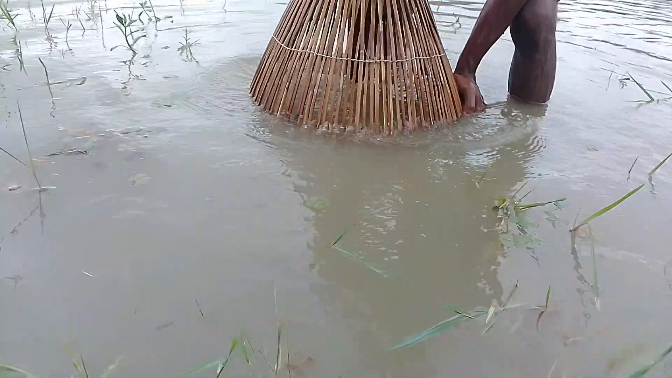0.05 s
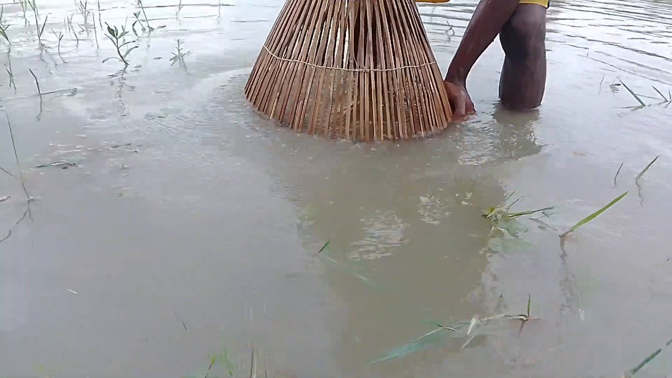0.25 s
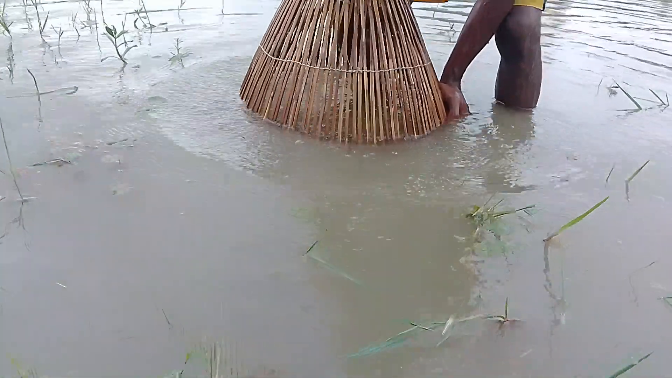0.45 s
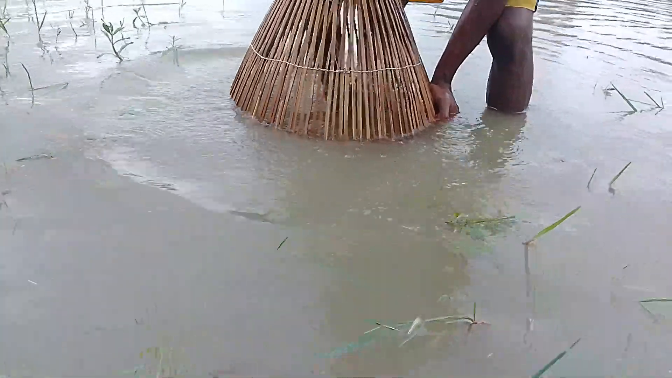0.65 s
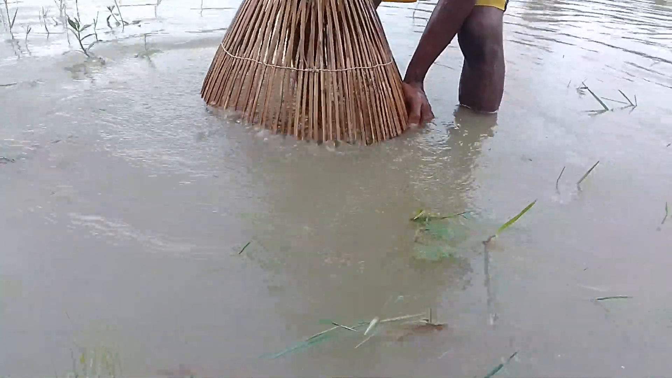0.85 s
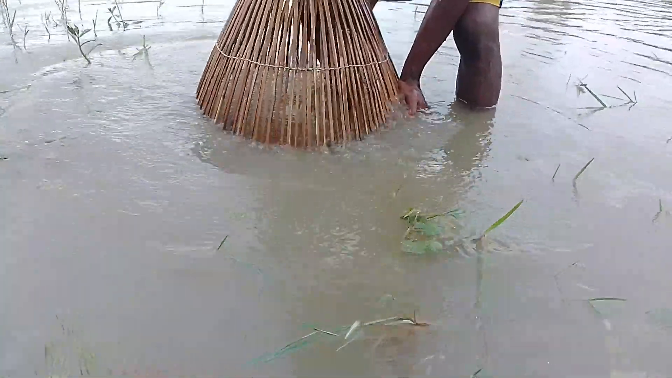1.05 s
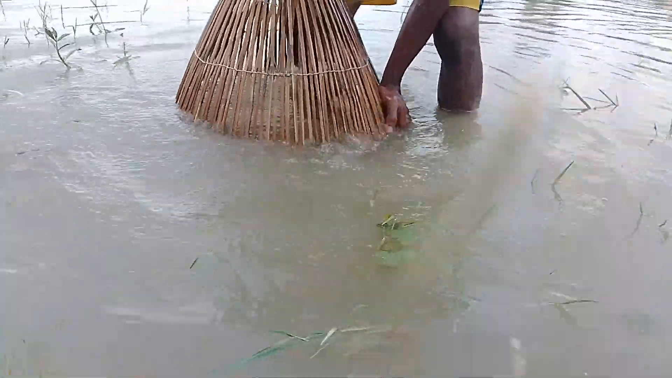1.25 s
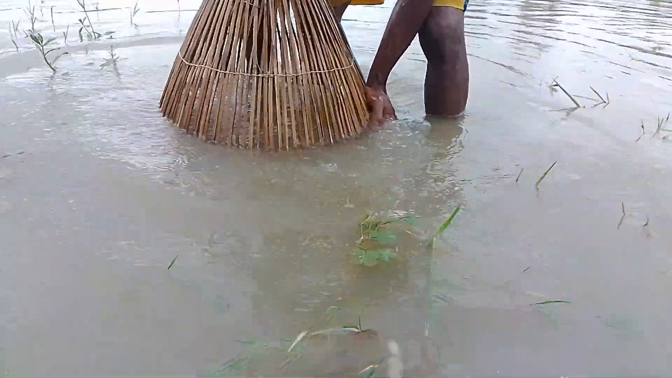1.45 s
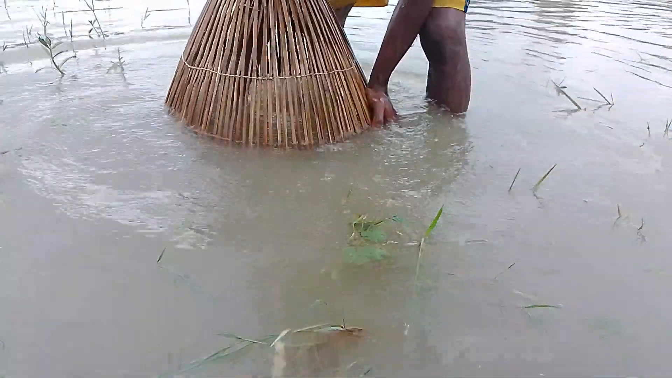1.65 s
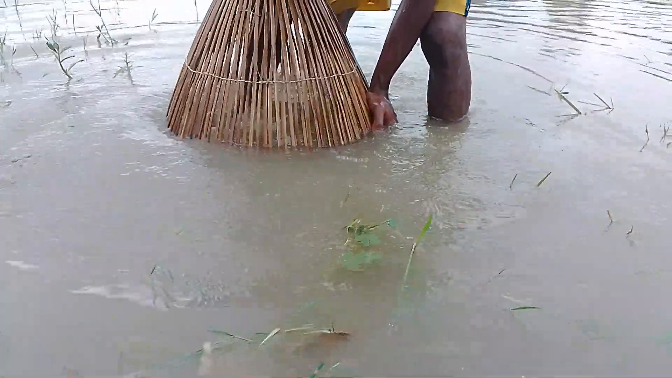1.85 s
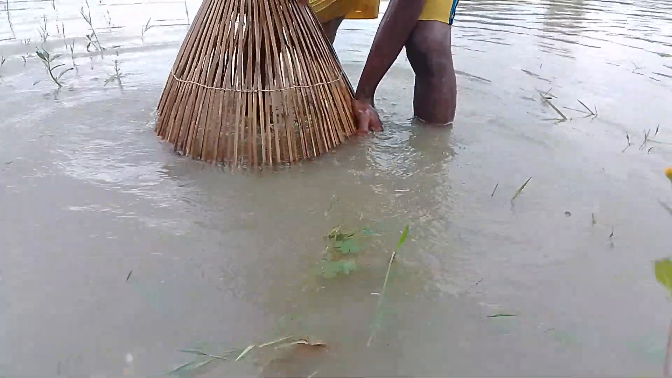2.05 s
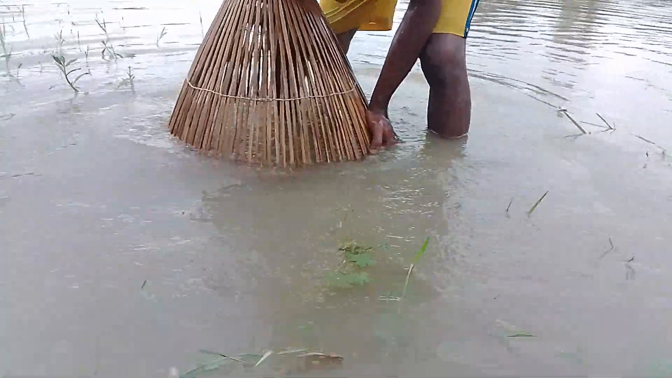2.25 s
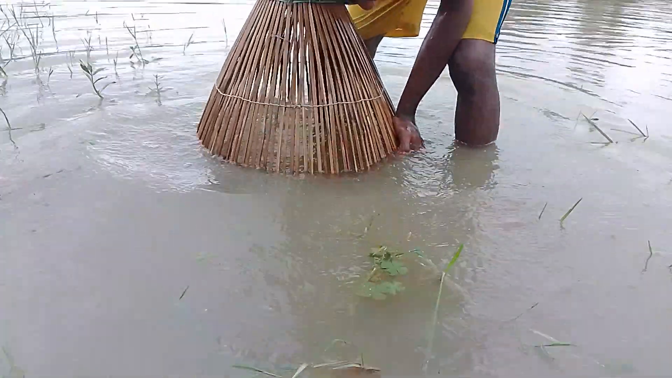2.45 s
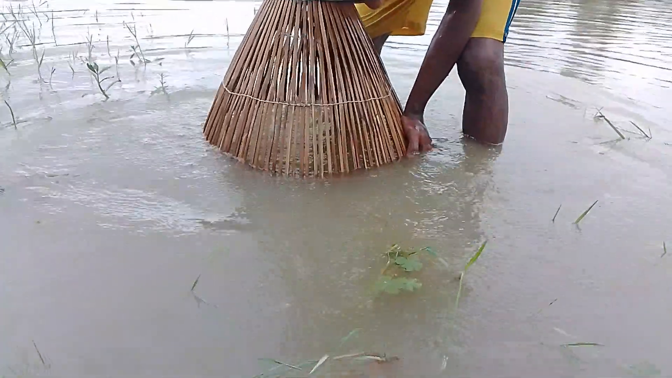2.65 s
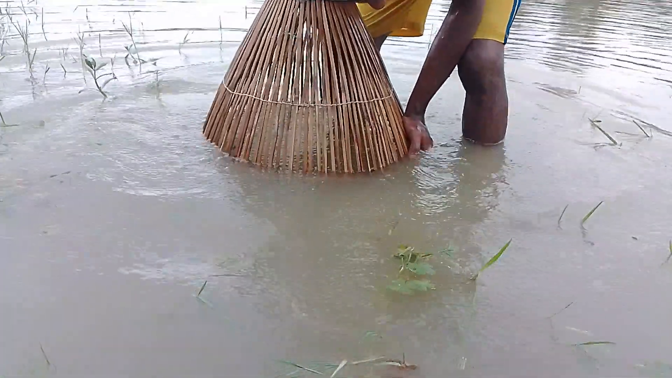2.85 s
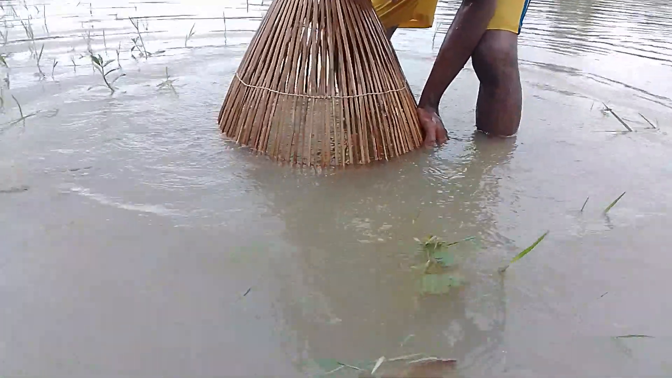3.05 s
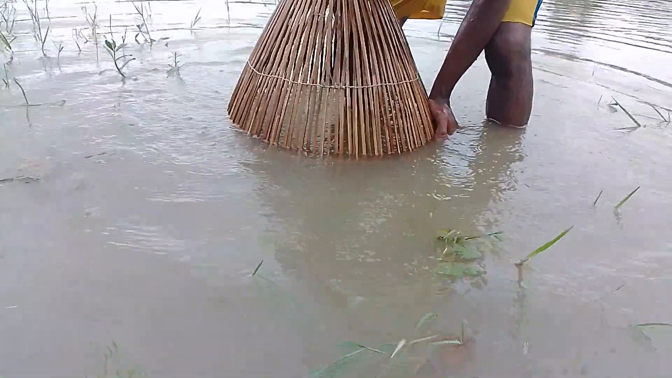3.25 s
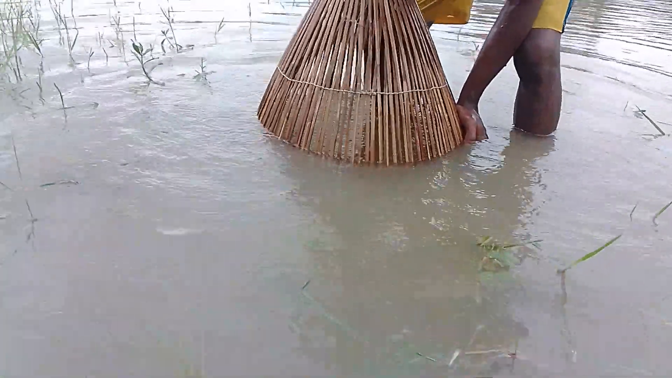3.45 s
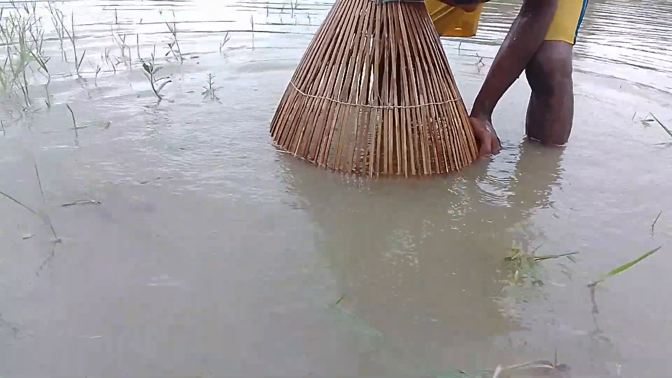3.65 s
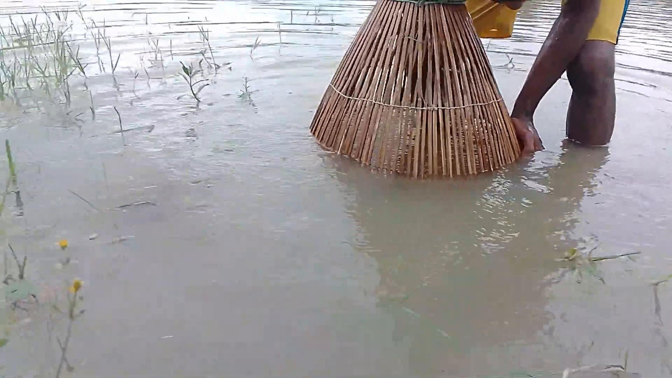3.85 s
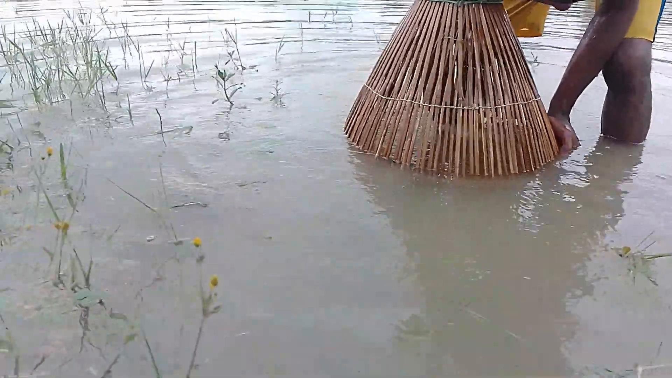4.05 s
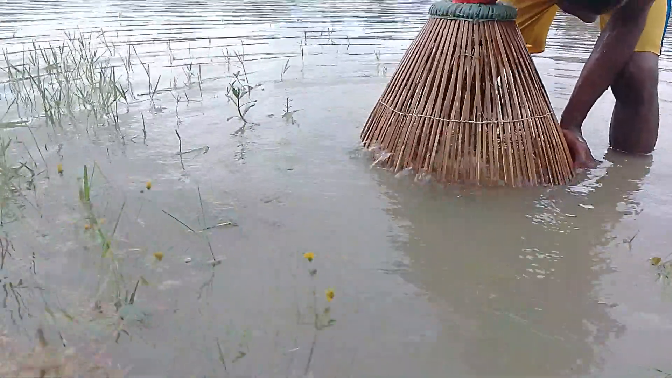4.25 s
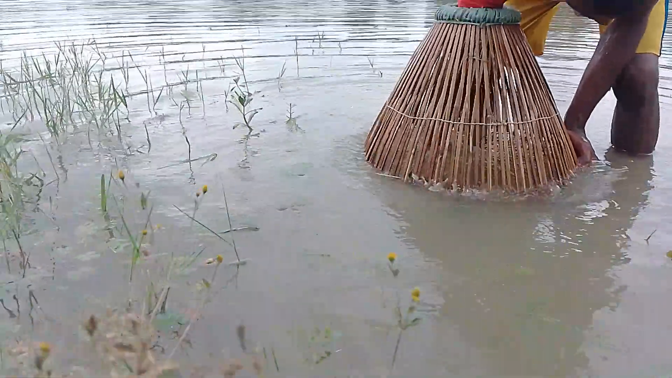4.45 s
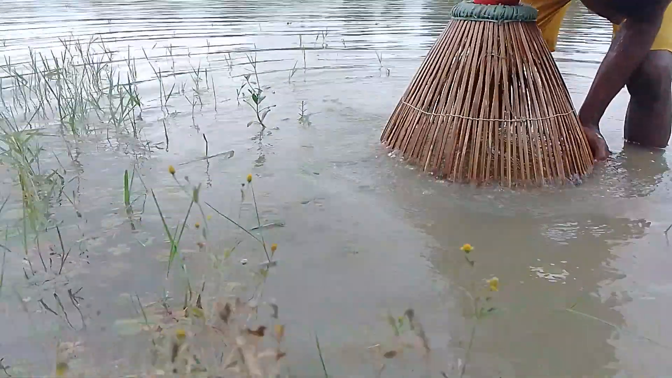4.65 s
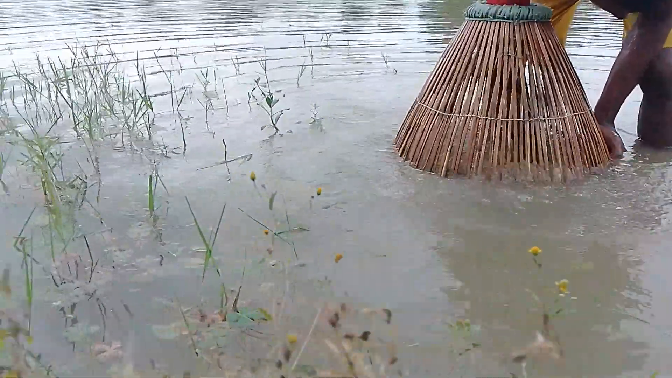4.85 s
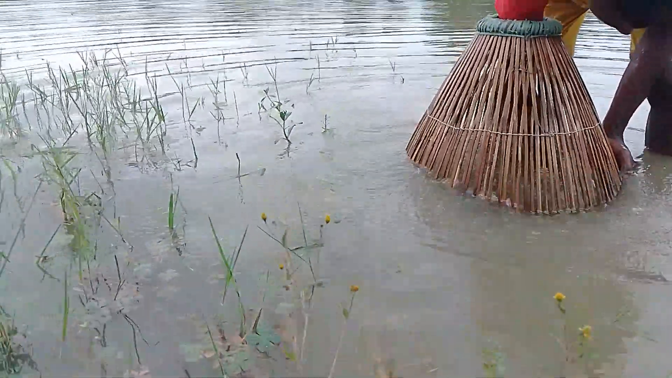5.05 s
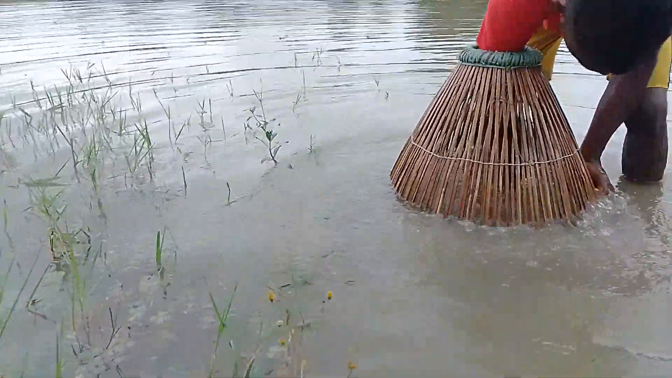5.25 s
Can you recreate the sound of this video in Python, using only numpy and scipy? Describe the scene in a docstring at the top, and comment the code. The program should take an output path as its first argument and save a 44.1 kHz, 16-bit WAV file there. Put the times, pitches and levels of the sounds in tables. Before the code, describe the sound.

Close, dry outdoor sound of a bamboo basket pushed about in shallow muddy water. A small trickle opens, then gulping sloshes build to a loud plop near 1.35 seconds, with a lighter slosh before 2. A quiet gap follows with drips, faint engine chugging, high cricket buzzes and a bird call. Two stronger bursts of splashing come after 4 seconds.

```python
"""Flooded field: a bamboo basket trap is pushed about; muddy water gulps, gurgles and slaps, drops fall back.
Water is swarms of ringing bubbles, single air pockets, drips and drop ticks, plus noise bursts for slaps.
Far off a one-cylinder engine chugs (gliding barks, puffs, clacks) and a bush cricket buzzes (pulsed tone);
a few birds call faintly (gliding tones). Filtered noise is the open air; noise tails scatter and echo the water."""
import sys
import numpy as np
from scipy import signal
from scipy.fft import rfft, irfft, next_fast_len
from scipy.io import wavfile
from scipy.ndimage import uniform_filter1d, map_coordinates

SR = 44100
rng = np.random.default_rng(int(sys.argv[2]) if len(sys.argv) > 2 else 0)


def to_wav(sig):
    """Store sig (one row per channel, or 1-D mono) as 16-bit WAV at the path in sys.argv[1].

    Samples outside -1..1 are clipped; the rate is SR.
    """
    pcm = np.clip(np.atleast_2d(sig), -1, 1) * 32767
    pcm = np.round(pcm).astype(np.int16)
    wavfile.write(sys.argv[1], SR, pcm.T)  # frames by channels


N = 233906
TIME = np.arange(N) / SR
ONSET_DB_PER_S = 396  # rise of a stroke and of the draining

# spray spectrum: f/Hz, relative density/dB
SPRAY_SPECTRUM = [(2000, -28), (5000, -13.5), (6600, -12), (8300, -2), (9700, 6), (10600, -2), (11800, -14),
                  (13000, -19.5), (16000, -18.5)]
# basket strokes: patter offset/dB, curve of (t/s, churn level/dB, spray level/dB)
BASKET_STROKES = [ (-0.5, [(0, -45, -48), (.08, -52.5, -50.5), (.16, -52, -52), (.24, -61.5, -55.5)]),
                  (2, [(.71, -63, -56.5), (.84, -60, -54.5), (.9, -50, -46.5), (1.04, -51.5, -50.5),
                  (1.09, -44, -46.5), (1.21, -48, -44), (1.335, -38.5, -41), (1.38, -47, -52.5),
                  (1.47, -48.5, -48)]), (-2.5, [(1.69, -55.5, -47.5), (1.75, -52, -50.5),
                  (1.785, -44.5, -44.5), (1.86, -49, -48), (1.96, -54.5, -53.5), (2, -50, -42.5),
                  (2.04, -58.5, -54.5)]), (-1.5, [(4.15, -54.5, -53), (4.185, -43.5, -53.5),
                  (4.23, -47, -46.5), (4.305, -44, -41.5), (4.34, -39.5, -45.5), (4.38, -50, -40),
                  (4.48, -55, -56), (4.56, -60.5, -43.5), (4.62, -57, -52.5)]), (3, [(4.87, -55.5, -81),
                  (4.93, -53, -48), (4.98, -45.5, -57), (5.04, -44, -36.5), (5.075, -44, -47),
                  (5.105, -47.5, -38.5), (5.14, -52.5, -48), (5.195, -47.5, -53.5), (5.3, -52, -46)]), ]


def amp(db):
    """Decibels to gain."""
    return 10 ** (np.asarray(db) / 20)


def unit(x):
    """Scale to rms 1."""
    return x / np.sqrt(np.mean(x ** 2) + 1e-20)


def fade(t, t60):
    """Free decay by 60 dB in t60 seconds."""
    return np.exp(-np.log(1000) * t / t60)


def add(out, s, x):
    """Mix x into out at s seconds."""
    i = int(np.clip(round(s * SR), 0, N))
    out[i:i + len(x)] += x[:N - i]


def wobble(rate):
    """Smooth random curve, rate knots a second."""
    knots = rng.standard_normal(int(N * rate / SR) + 4)
    return map_coordinates(knots, [TIME * rate])


def colour(x, points):
    """Minimum-phase filter of the given (f/Hz, level/dB) shape; output at rms 1."""
    m = 2 * next_fast_len(N // 2 + SR // 4)
    hz, db = np.transpose(points)
    bin_hz = np.fft.rfftfreq(m, 1 / SR)
    gain = amp(np.interp(np.log(bin_hz + 1), np.log(hz), db))
    # folding the cepstrum makes the filter causal
    cepstrum = irfft(np.log(gain), m)
    cepstrum[1:m // 2] *= 2
    cepstrum[m // 2 + 1:] = 0
    response = np.exp(rfft(cepstrum))
    return unit(irfft(rfft(x, m) * response, m)[:N])


def noise(points):
    """Coloured noise of rms 1."""
    return colour(rng.standard_normal(N), points)


def band(x, low_hz, high_hz):
    """Causal band-pass with steep skirts."""
    sos = signal.butter(4, [low_hz, high_hz], "bandpass", fs=SR, output="sos")
    return signal.sosfilt(sos, x)


def bubble(t, hz, t60, rise):
    """An air pocket starts to ring within a cycle; its pitch climbs as it nears the surface."""
    ring = np.sin(2 * np.pi * hz * t * (1 + rise * t / t60 / 2))
    return ring * fade(t, t60) * (1 - np.exp(-1.3 * hz * t))


def swarm(rate, low_hz, high_hz, cycles, spread_db, wash, even_s):
    """Bubbles of random size and strength over a wash of noise, evened in level over even_s."""
    when, pitch, damping, strength = rng.random((int(rate * N / SR), 4)).T
    hz = low_hz * (high_hz / low_hz) ** pitch
    t60 = cycles / hz * (.5 + damping)  # small bubbles ring high and briefly
    size = amp(-spread_db * np.log(strength + 0.0082))  # many weak, a few strong
    length = (t60 * SR * 2 / 3).astype(int) + 1  # samples, down to -40 dB
    # all bubbles laid end to end, then summed at their start times
    which = np.repeat(np.arange(len(hz)), length)
    age = np.arange(len(which)) - (np.cumsum(length) - length)[which]
    rings = size[which] * bubble(age / SR, hz[which], t60[which], rise=.14)
    position = (when * N).astype(int)[which] + age
    x = unit(np.bincount(position, rings, N)[:N]) + wash * rng.standard_normal(N)
    power = np.abs(uniform_filter1d(x ** 2, int(even_s * SR) + 2))
    return x / np.sqrt(power + 1e-9)


def background():
    """Open air over the field, and the fine fizz of water draining off the basket."""
    # open-air spectrum: f/Hz, relative density/dB
    field_spectrum = [(20, 1), (70, -5.5), (125, -1.5), (162, -25.5), (195, -3), (330, -0.5), (450, -3),
                      (800, -3), (1500, -8.5), (2200, -19), (3000, -17), (6000, -27.5), (9700, -28),
                      (12000, -20.5), (16000, -30)]
    drain_s, drain_level_db, drain_db_per_s = 1.8, -61, 7.5  # start, level, fall
    bubbles = swarm(1800, 5350, 14700, cycles=5.8, spread_db=2.0, wash=1.0, even_s=0.027)
    fizz = colour(bubbles, SPRAY_SPECTRUM)
    fall_db = drain_db_per_s * (TIME - drain_s)
    onset_db = ONSET_DB_PER_S * (drain_s - TIME)
    drain_db = drain_level_db - np.maximum(fall_db, onset_db)
    return amp(-68.5) * noise(field_spectrum) + amp(drain_db) * fizz


def engine():
    """Every firing of the far engine brings a clack, then a hollow bark and a low puff from the pipe."""
    # bark loudness drifting with the air: t/s, nominal level/dB
    bark_levels = [(0, -57), (2.8, -65.5), (3.25, -60), (5.3, -52)]
    # clack spectrum: f/Hz, relative density/dB
    clack_spectrum = [(150, -31), (250, -6), (750, 4.5), (1200, -4.5), (2300, -7.5), (3500, -23),
                      (8000, -25)]
    first_s, period_s, lead_s, uneven_db = .1, .1133, .06, 1.2
    barks, puffs, clacks = np.zeros((3, N))
    t = np.arange(SR // 6) / SR - lead_s
    for s in np.arange(first_s, N / SR, period_s):
        size, pitch, phase = rng.standard_normal(3)
        turns = 478 * (1 + .015 * pitch - 0.86 * t) * t  # pitch falls
        bark = np.sin(2 * np.pi * turns + np.pi * phase) * np.exp(-(t / 0.017) ** 2)
        add(barks, s - lead_s, amp(uneven_db * size) * bark)
        add(puffs, s - lead_s, np.cos(2 * np.pi * 98 * t) * np.exp(-(t / 0.0085) ** 2))
        add(clacks, s - lead_s, (t > -.035) * fade(np.abs(t + 0.024), 0.23))
    drift_db = np.interp(TIME, *np.transpose(bark_levels))
    flutter = 1 + 0.48 * wobble(140)  # the exhaust flutters
    barks = barks * amp(drift_db) * flutter
    # steady pipe tone, heard between firings
    pipe = noise([(300, -42.0), (410, -7.0), (455, 2.5), (495, -2.5), (550, -20), (800, -28.5)])
    return barks + amp(-71.5) * pipe + amp(-65.5) * puffs + amp(-64.5) * clacks * noise(clack_spectrum)


def course(s, db, fall_db_per_s):
    """Level in dB of one stroke: it sets in fast, runs its course and dies away."""
    before, after = np.maximum(s[0] - TIME, 0), np.maximum(TIME - s[-1], 0)
    return np.interp(TIME, s, db) - ONSET_DB_PER_S * before - fall_db_per_s * after


def stir():
    """Gains of gulps, gurgles, patter and spray: the harder the water churns, the bigger the bubbles it traps."""
    settle_db_per_s, spray_fall_db_per_s = 93, 38.5  # churn dies sooner than spray
    brisk_db = -45  # churn and spray of a brisk stroke
    gulp_brisk_db, gulp_growth = -45.5, 1.73  # growth in dB per dB of churn
    patter_brisk_db, spray_growth, churn_growth = -50.5, 0.93, 0.56  # growth in dB per dB
    power = np.zeros((4, N))
    for patter_offset_db, curve in BASKET_STROKES:
        s, churn, spray = np.transpose(curve)
        churn_db = course(s, churn, settle_db_per_s)
        spray_db = course(s, spray, spray_fall_db_per_s)
        churn_excess_db, spray_excess_db = churn_db - brisk_db, spray_db - brisk_db
        gulp_db = gulp_brisk_db + gulp_growth * churn_excess_db
        patter_db = patter_brisk_db + patter_offset_db
        patter_db = patter_db + spray_growth * spray_excess_db + churn_growth * churn_excess_db
        power += amp(np.maximum([gulp_db, churn_db, patter_db, spray_db], -140)) ** 2
    return np.sqrt(power)


def slosh():
    """Water forced through the slats traps air in all sizes and throws up spray."""
    # spectra of big, medium and small bubbles: f/Hz, relative density/dB
    gulp_spectrum = [(100, -22.5), (165, -29), (210, -15.5), (310, 0), (500, 9), (650, 4.5), (900, -19),
                     (2000, -58)]
    gurgle_spectrum = [(300, -29), (560, -11.5), (760, 0.5), (1150, 2), (1330, -1.5), (1480, 0),
                       (1780, -0.5), (2000, 0), (2300, -2), (2700, -32), (6000, -67)]
    patter_spectrum = [(1200, -29), (2300, 3), (2700, 0), (3400, 2.5), (4500, 3), (6200, 3), (7500, 10),
                       (12000, -59)]
    gulps = swarm(600, 219.0, 797, cycles=14.6, spread_db=3.5, wash=0.73, even_s=0.031)
    gurgles = swarm(1900, 597.6, 2737, cycles=32.0, spread_db=5, wash=1.0, even_s=0.033)
    patter = swarm(2600, 2220, 7060, cycles=51, spread_db=5.5, wash=0.37, even_s=0.039)
    spray = swarm(2000, 5900, 13440, cycles=84, spread_db=5.5, wash=1.0, even_s=0.02)
    layers = [colour(gulps, gulp_spectrum), colour(gurgles, gurgle_spectrum),
              colour(patter, patter_spectrum), colour(spray, SPRAY_SPECTRUM)]
    water = np.sum(stir() * layers, axis=0)
    return band(water, low_hz=88, high_hz=15600)


def drops():
    """Each drop hitting the surface ticks sharply and scatters a brief fizz."""
    # drops: t/s, level/dB
    drop_hits = [(0.035, -24.5), (0.1461, -21.5), (0.1785, -24.5), (0.8703, -19), (0.9817, -20.5),
                 (1.014, -26), (1.0755, -21), (1.5519, -15.5), (1.6074, -24.5), (1.9869, -16.5),
                 (2.1791, -24.5), (3.316, -31.5), (4.2673, -24), (4.3822, -22.5), (4.4568, -19.5),
                 (4.5431, -9), (4.6341, -28), (5.174, -17.5)]
    tick_hz, tick_spread = 8820, 0.03  # spread relative
    ticks, scatter, t = np.zeros(N), np.zeros(N), np.arange(SR // 16) / SR
    for s, db in drop_hits:
        hz = tick_hz * np.exp(tick_spread * rng.standard_normal())
        tick = bubble(t, hz, 0.0011, rise=.03) * (1 - np.exp(-t / 0.000067))
        add(ticks, s + 0.001016, amp(db) * tick / np.abs(tick).max())
        burst = fade(t, 0.017) * (1 - np.exp(-t / 0.0004))
        add(scatter, s + 0.00057, amp(db - 15.5) * burst)
    return band(ticks, low_hz=4400, high_hz=11400) + scatter * noise(SPRAY_SPECTRUM)


def plops():
    """Single air pockets and a few drips ring out; the gentler they are, the longer they ring."""
    # air pockets and drips: t/s, level/dB, f/Hz
    single_rings = [(.097, -30.5, 783), (.247, -49, 1240), (0.324, -39, 2200), (0.709, -47.5, 1307),
                    (0.789, -42.5, 1057), (0.835, -39, 1014), (0.862, -31.5, 980), (.985, -32.5, 479),
                    (1.076, -25.5, 1590), (1.094, -37, 336), (1.143, -26, 322), (1.172, -37.5, 237),
                    (1.331, -20.5, 517), (1.351, -3.5, 940), (1.389, -27, 1060), (1.662, -34, 770),
                    (1.695, -32, 2220), (1.786, -30.5, 620), (1.833, -26, 510), (1.85, -33, 570),
                    (1.999, -27, 930), (2.063, -46.5, 3250), (2.175, -35, 1630), (2.218, -46, 2180),
                    (2.344, -51, 4000), (4.1, -42, 1410), (4.147, -30.5, 1230), (4.178, -29, 550),
                    (4.222, -27, 1000), (4.315, -9, 535), (4.335, -17, 1760), (4.554, -41, 1620),
                    (4.918, -31, 1720), (4.948, -34, 1800), (4.972, -29.5, 453), (5.086, -28.5, 458),
                    (5.195, -24.5, 850), (5.243, -35.5, 690)]
    ref_cycles, ref_db, shortening = 25.8, -30, 0.47  # ring at ref_db; dB shorter per dB louder
    out, t = np.zeros(N), np.arange(SR // 8) / SR
    for s, db, hz in single_rings:
        cycles = ref_cycles * amp(shortening * (ref_db - db))
        add(out, s, amp(db) * bubble(t, hz, cycles / hz, rise=0.2))
    return band(out, low_hz=190, high_hz=6100)


def drips(count=10):
    """After each stroke, water drips from the slats, ever more sparsely and softly."""
    mean_lag_s, level_db, fall_db_per_s = .14, -47.5, 30
    centre_hz, spread, cycles = 2985, .33, 39  # spread relative; cycles to -60 dB
    out, t = np.zeros(N), np.arange(SR // 12) / SR
    for _, curve in BASKET_STROKES:
        lags_s = rng.exponential(mean_lag_s, count)
        for lag_s, (pitch, size) in zip(lags_s, rng.standard_normal((count, 2))):
            hz = centre_hz * np.exp(spread * pitch)
            db = level_db - fall_db_per_s * lag_s + 3 * size
            add(out, curve[-1][0] + lag_s, amp(db) * bubble(t, hz, cycles / hz, rise=.1))
    return out


def birds():
    """Short, arched, distant glides; the raspy ones waver in pitch and flutter."""
    # notes: t/s, length/s, start f/Hz, end f/Hz, level/dB, rasp (pitch waver)/Hz
    bird_notes = [(0.267, 0.251, 2290, 2320, -67.5, 91), (2.66, 0.11, 4600, 3550, -62, 220),
                  (2.745, 0.064, 3400, 2700, -59, 220), (2.78, 0.043, 2650, 3170, -59.5, 270),
                  (3.851, 0.073, 3080, 3700, -78, 15), (4.664, 0.061, 3420, 3500, -66, 15)]
    out = np.zeros(N)
    for s, length_s, start_hz, end_hz, db, rasp_hz in bird_notes:
        n = int(length_s * SR)
        arch = np.sin(np.linspace(0, np.pi, n))
        waver = wobble(503)[:n]
        hz = np.linspace(start_hz, end_hz, n) + 90 * arch + rasp_hz * waver
        flutter = amp(-rasp_hz / 20 * np.sin(np.pi * 45 * TIME[:n]) ** 2)
        tone = np.sin(2 * np.pi * np.cumsum(hz) / SR)
        add(out, s, amp(db) * arch * flutter * tone)
    return out


def cricket():
    """Wing strokes, each falling in pitch, come in chirps that swell and stop short."""
    # chirps: end t/s, final level/dB
    chirp_ends = [(.52, -61), (1.779, -49.5), (2.262, -42), (2.49, -45), (2.771, -57.5), (3.048, -54.5),
                  (3.277, -55), (3.522, -52.5), (3.758, -54.5)]
    chirp_s, stroke_hz = .158, 102.5
    out, t = np.zeros(N), np.arange(int(chirp_s * SR)) / SR
    for end_s, db in chirp_ends:
        stroke = (t - t[-1]) * stroke_hz % 1  # phase within a wing stroke
        hz = 10230 - 750 * (stroke - .5) + 90 * wobble(900)[:len(t)]
        swell = amp(db - 6.7 * (1 - t / t[-1]) ** 2)
        pulse = np.abs(np.sin(np.pi * stroke)) ** 3
        tone = np.sin(2 * np.pi * np.cumsum(hz) / SR)
        add(out, end_s - chirp_s, swell * pulse * tone)
    return out


def slaps():
    """A sheet of water lands: a burst of broad noise with a hiss of spray."""
    # sheets and spatters: t/s, body level/dB, spray level/dB, t60/s
    water_sheets = [(0.869, -39.5, -31, 0.056), (1.163, -30.5, -31.5, 0.041), (1.348, -34.5, -36, 0.14),
                    (3.346, -64.5, -52.5, 0.11), (3.407, -69, -58, 0.15), (4.181, -39.5, -50, 0.042),
                    (4.316, -36, -31, 0.11), (4.332, -19, -38, 0.047), (4.548, -61, -38, 0.067),
                    (4.555, -29, -28, 0.026), (5.088, -25, -31.5, 0.032), (5.182, -33, -41, 0.072)]
    # body spectrum: f/Hz, relative density/dB
    body_spectrum = [(50, -40), (110, -19.5), (135, -37), (170, -53), (210, -16.5), (550, -20.5),
                     (1100, -8), (1500, -11), (1900, -16), (2600, -21), (6000, -19.5), (10500, -17.5),
                     (13000, -34)]
    out, body, hiss = np.zeros(N), noise(body_spectrum), noise(SPRAY_SPECTRUM)
    for s, body_db, spray_db, t60 in water_sheets:
        t = np.clip(TIME - s, 0, 1)
        swell = 1 - np.exp(-t / .0016)
        out += fade(t, t60) * swell * (amp(body_db) * body + amp(spray_db) * hiss)
    return band(out, low_hz=70, high_hz=18000)


def bump():
    """A soft, low bump: a few damped modes ring together."""
    # bumps: t/s, level/dB
    bump_hits = [(1.994, -46.5)]
    # modes: f/Hz, relative level/dB, t60/s
    thud_modes = [(39.7, -10, 0.064), (92, 3.5, 0.066), (223, 0.5, 0.1)]
    out, t = np.zeros(N), np.arange(SR // 6) / SR
    for s, db in bump_hits:
        ring = sum(amp(level) * np.sin(2 * np.pi * hz * t) * fade(t, t60) for hz, level, t60 in thud_modes)
        add(out, s, amp(db) * ring * (1 - np.exp(-t / 0.002)))
    return out


def slats(x, db=-11, t60=0.032):
    """The slats and the water surface scatter each sound for a moment."""
    tail = noise([(200, -0.5), (2000, -2), (10000, -1.5), (16000, -8)])
    tail = tail * fade(TIME, t60) * (TIME > .001)
    return amp(db) * signal.fftconvolve(x, tail / np.linalg.norm(tail))[:N]


def far_bank(x, db=-24, t60=0.93):
    """The bank and its trees send back a late, dull, diffuse echo."""
    # echo spectrum: f/Hz, relative density/dB
    bank_spectrum = [(200, -21), (460, -8), (620, -15), (830, -8.5), (1200, 3), (1500, 10.5), (1800, 8.5),
                     (2500, 4.5), (3400, -3.5), (5000, -14), (12000, -38)]
    onset = np.clip((TIME - .15) / 0.084, 0, 1)
    tail = noise(bank_spectrum) * fade(TIME, t60) * onset
    return amp(db) * signal.fftconvolve(x, tail / np.linalg.norm(tail))[:N]


def scene():
    """The near water and its faint echoes over the sounds of the field."""
    water = slosh() + plops() + drips() + slaps() + drops()
    echoes = slats(water) + far_bank(water)
    field = bump() + engine() + cricket() + birds() + background()
    return (water + echoes + field)[None]


def record(dry):
    """Cut everything above 16 kHz."""
    top_hz = 16000
    m = next_fast_len(N + SR // 4)
    keep = np.fft.rfftfreq(m, 1 / SR) < top_hz
    return irfft(rfft(dry, m) * keep, m)[..., :N]


dry = scene()
out = record(dry)
to_wav(out)
```